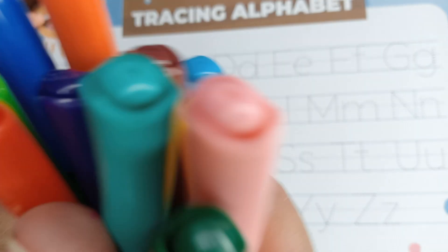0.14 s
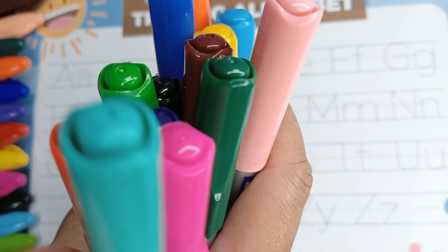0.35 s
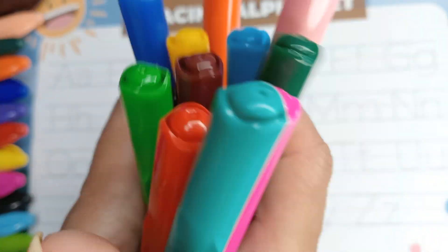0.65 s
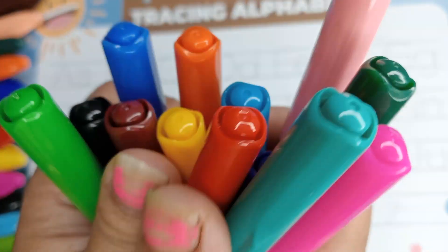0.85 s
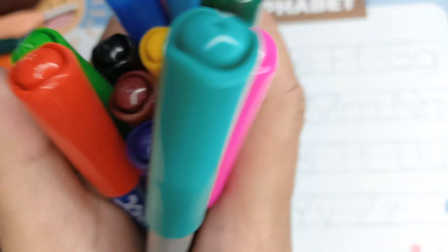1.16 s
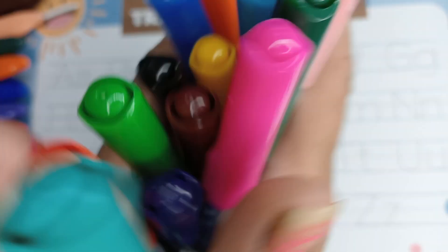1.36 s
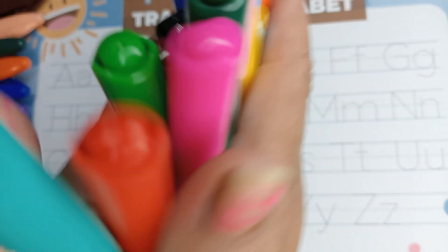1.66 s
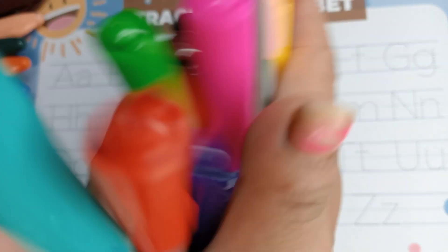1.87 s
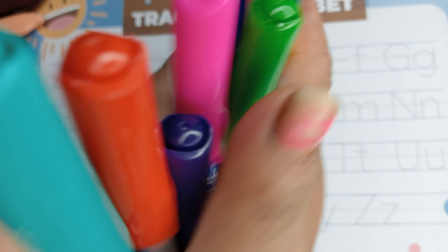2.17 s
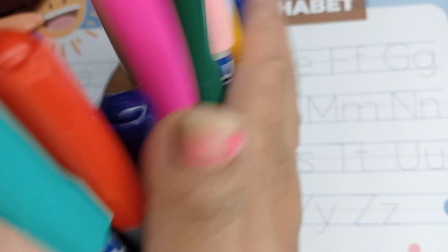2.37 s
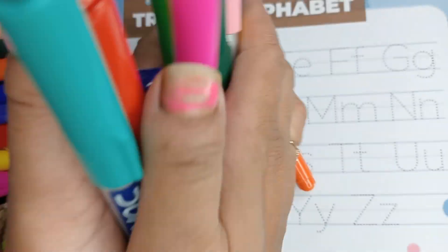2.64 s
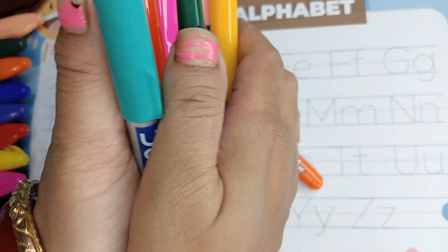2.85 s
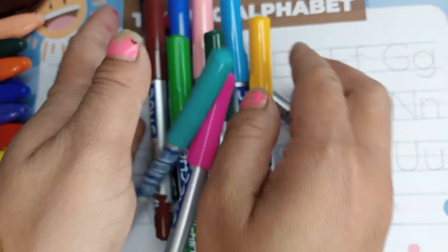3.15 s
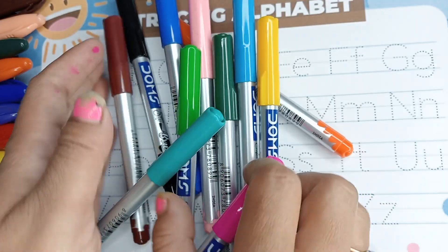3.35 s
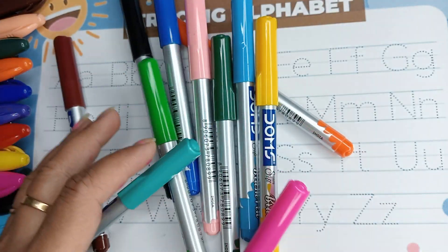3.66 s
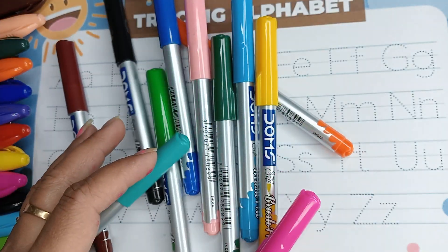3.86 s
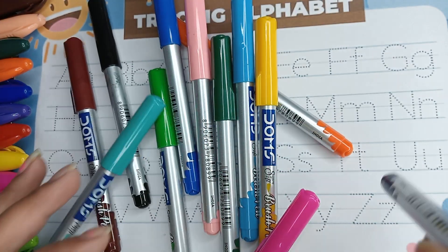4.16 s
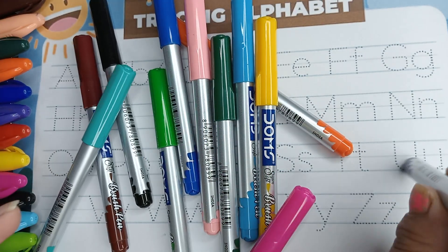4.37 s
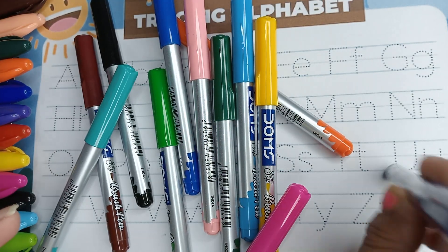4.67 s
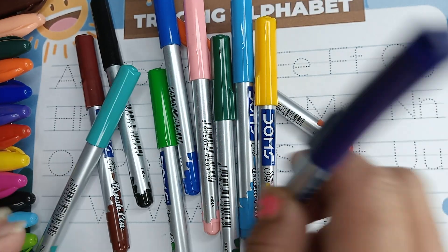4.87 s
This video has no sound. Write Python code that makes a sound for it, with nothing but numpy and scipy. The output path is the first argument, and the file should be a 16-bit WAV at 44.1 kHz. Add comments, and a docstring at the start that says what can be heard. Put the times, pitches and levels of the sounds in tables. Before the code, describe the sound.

A bundle of pens clicks in rubbing hands, spills onto paper with dull desk thuds, followed by three loud, sharp raps.

```python
"""A handful of plastic pens is rolled between two palms: skin rubs, barrels knock together in bursts.
From 2.2 s they drop on a paper pad and the desk under it thuds; the heap settles by 4.2 s.
From 4.4 s one pen is rapped down three times; the loudest raps overload the microphone.
A small furnished room answers throughout, over a faint room tone."""
import sys
import numpy as np
from scipy import signal
from scipy.fft import rfft, irfft, next_fast_len
from scipy.io import wavfile

SR = 44100
rng = np.random.default_rng(int(sys.argv[2]) if len(sys.argv) > 2 else 0)


def digitize_waveform(pressure):
    """Quantize a signal to 16-bit integers and store it at the path in sys.argv[1].

    Rows of a 2-D input are taken as channels; values are limited to [-1, 1].
    """
    field = np.atleast_2d(pressure).T
    bounded = np.clip(field, -1, 1)
    quanta = np.round(bounded * 32767).astype(np.int16)
    wavfile.write(sys.argv[1], SR, quanta)


N = 221330


def from_db(db):
    """Decibels to gain."""
    return 10 ** (np.asarray(db) / 20)


def unit_rms(x):
    """Scale to rms 1."""
    return x / np.sqrt(np.mean(x ** 2) + 1e-20)


def at_hz(points, hz):
    """Interpolate a table on a log-frequency axis."""
    points_hz, values = np.transpose(points)
    return np.interp(np.log(hz + 1), np.log(points_hz), values)


def butter(x, order, edge_hz, kind):
    """Butterworth filter."""
    return signal.sosfilt(signal.butter(order, edge_hz, kind, fs=SR, output="sos"), x)


def strike(times_s, peak_db, modes, contact_s, pitch_spread, spread_db, samples,
           phase_spread_cycles=0, pitch_scale=1, at_peak=True):
    """Each blow rings all modes, swelling during contact. Times mark peaks if at_peak, else onsets."""
    hz, mode_db, t60_s = np.transpose(modes)[:, None, :, None]
    jitter = rng.standard_normal((len(times_s), 3 * len(modes)))[:, :, None]
    t = np.arange(samples) / SR
    hz = hz * np.reshape(pitch_scale, (-1, 1, 1)) * np.exp(pitch_spread * jitter[:, 0::3])
    phase = 2 * np.pi * (hz * t + phase_spread_cycles * jitter[:, 2::3])
    rings = from_db(mode_db + spread_db * jitter[:, 1::3] - 60 * t / t60_s) * np.sin(phase)
    blows = rings.sum(axis=1) * (1 - np.exp(-(t / contact_s) ** 2))
    blows *= (from_db(peak_db) / np.abs(blows).max(axis=1))[:, None]
    start = (np.asarray(times_s) * SR).astype(int) - at_peak * np.abs(blows).argmax(axis=1)
    out = np.zeros(N + samples)
    np.add.at(out, np.maximum(start, 0)[:, None] + np.arange(samples), blows)
    return out[:N]


# room tone spectrum: (frequency [Hz], relative density [dB])
ROOM_TONE = [(18, -48), (30, -24), (59, -15.5), (199, -12), (336, -12.5), (384, -14), (584, -22.5),
             (2170, -26), (16000, -47.5)]


def room_tone(rms_db=-67.5):
    """Steady, faint, low noise."""
    shape = from_db(at_hz(ROOM_TONE, np.arange(N // 2 + 1) * SR / N))
    return from_db(rms_db) * unit_rms(irfft(rfft(rng.standard_normal(N)) * shape, N))


# echo decay: (frequency [Hz], t60 [s])
ROOM_DECAY = [(100, 0.41), (260, 0.47), (700, 0.3), (1840, 0.34), (4850, 0.28), (12800, 0.2)]
# echo colour: (frequency [Hz], gain [dB])
ROOM_COLOUR = [(100, -12), (400, -7), (1200, -17.5), (3000, -15.5), (6000, -14.5), (10000, -17),
               (15000, -14)]


def room(x, first_echo_s=0.00051):
    """Diffuse echoes: octave bands of noise, each dying at its own rate."""
    t = np.arange(SR // 2) / SR
    echoes = np.zeros(len(t))
    for low_hz in 60 * 2. ** np.arange(8):
        band = butter(rng.standard_normal(len(t)), 2, [low_hz, 2 * low_hz], "band")
        echoes += band * from_db(-60 * t / at_hz(ROOM_DECAY, low_hz * np.sqrt(2)))
    echoes *= np.clip(t / first_echo_s - 1, 0, 1) / np.sqrt(np.sum(echoes ** 2))
    size = next_fast_len(N + len(t))
    colour = from_db(at_hz(ROOM_COLOUR, np.arange(size // 2 + 1) * SR / size))
    return irfft(rfft(x, size) * rfft(echoes, size) * colour, size)[:N]


# thump modes: (multiple of thump pitch [1], level [dB], t60 [s])
THUMP_MODES = [(1, -4, 0.023), (1.4, -3, 0.0097), (2.401, -2, 0.015)]
# desk top modes: (frequency [Hz], level [dB], t60 [s])
DESK_MODES = [(111, -1.5, 0.073), (152.9, 2, 0.23), (263, -2.5, 0.13), (384.8, -2.5, 0.15)]
# blows reaching the desk: (time [s], thump peak [dB], thump pitch [Hz], ring re thump [dB])
THUDS = [(2.232, -25, 124, -10.5), (2.325, -46, 144, -18), (2.448, -32, 156, -6), (2.498, -28, 108, -12),
         (2.561, -54, 137, 7), (2.701, -35.5, 162, -12), (2.721, -31, 83.4, -9), (2.811, -25.5, 130, -15),
         (2.898, -35, 150.6, -4), (3.131, -24, 146, -18), (3.154, -16, 210, -5.5), (3.2, -22, 246, -7),
         (3.243, -21, 131, -5.5), (3.288, -20, 150, -10), (3.376, -21.5, 148, -6), (3.437, -40.5, 137, 5),
         (3.484, -22.5, 258, -8.5), (3.53, -23.5, 398, -8.5), (3.547, -23.5, 158, -18),
         (3.726, -12, 169, -11.5), (3.869, -50, 114, 9), (3.955, -35, 148, 5), (4.069, -44.5, 156.6, -22),
         (4.17, -53, 163, -1), (4.425, -22, 255, -11), (4.602, -20, 414, -9.5), (4.793, -23.5, 427, -2.5)]


def desk_thuds():
    """A dull thump under each blow, then the desk top rings on."""
    times_s, peak_db, pitch_hz, ring_db = np.transpose(THUDS)
    thump = strike(times_s, peak_db, THUMP_MODES, contact_s=0.002,
                   pitch_spread=0.01, spread_db=3, samples=3000, pitch_scale=pitch_hz)
    ring = strike(times_s, peak_db + ring_db, DESK_MODES, contact_s=0.0042,
                  pitch_spread=0.016, spread_db=2.5, samples=9000, at_peak=False)
    return -(thump + ring)


# palm strokes and heap slides: (start [s], end [s], rattle [dB], pad re barrel [dB], skin rub [dB])
STROKES = [(0.0, 0.024, -37.5, -13.5, -55), (0.105, 0.188, -30.5, -14.5, -45.5),
           (0.258, 0.336, -44.5, -15, -62), (0.336, 0.362, -30, -13, -47.5), (0.39, 0.428, -25.5, -13, -46),
           (0.496, 0.511, -37, -15, -51), (0.522, 0.58, -30.5, -9.5, -47.5),
           (0.695, 0.745, -28.5, -12, -47), (0.838, 0.856, -38.5, -11.5, -55),
           (0.875, 0.909, -27, -13, -46.5), (1.007, 1.133, -39, -12.5, -54), (1.208, 1.271, -40, -7, -51.5),
           (1.339, 1.401, -29.5, -13, -47), (1.484, 1.54, -29, -14, -43), (1.622, 1.692, -28.5, -14.5, -46),
           (1.749, 1.762, -45, -13, -50.5), (1.775, 1.833, -27, -8.5, -45),
           (1.908, 1.974, -24.5, -13, -42.5), (2.034, 2.098, -25, -8.5, -45.5),
           (2.157, 2.178, -36, -11.5, -58), (2.188, 2.246, -21.5, -12, -40),
           (2.285, 2.361, -27.5, -8, -42.5), (2.43, 2.425, -26, -10.5, -56), (2.458, 2.504, -30, -8.5, -53),
           (2.569, 2.608, -31, -5, -46.5), (2.76, 2.83, -40, 6, -51), (2.887, 2.909, -34, -2.5, -48),
           (3.048, 3.108, -40.5, -9.5, -62), (3.141, 3.303, -34.5, 6.5, -44.5),
           (3.341, 3.437, -47.5, 12.5, -70), (3.46, 3.56, -46.5, 0.5, -70), (3.735, 3.82, -51, 6.5, -77),
           (3.858, 3.913, -65, 5, -72)]


def palm_rub():
    """Dull noise of rubbing skin, following the strokes."""
    rub = unit_rms(butter(rng.standard_normal(N), 2, [130, 800], "band"))
    t = np.arange(0, N / SR, 0.002)
    rub_db = np.transpose(STROKES)[4]
    level_db = stroke_db(t, rub_db, swell_db=5, rise_db_per_s=501.5, fall_db_per_s=502.5).max(axis=0)
    return from_db(np.interp(np.arange(N) / SR, t, level_db)) * rub


def stroke_db(t, end_db, swell_db, rise_db_per_s, fall_db_per_s):
    """Level at times t, one row per stroke: sets in, swells to end_db, dies."""
    start_s, end_s = np.transpose(STROKES)[:2, :, None]
    ramp_db = swell_db * np.clip((t - end_s) / (end_s - start_s), -1, 0)
    onset_db = rise_db_per_s * np.maximum(start_s - t, 0)
    release_db = fall_db_per_s * np.maximum(t - end_s, 0)
    return end_db[:, None] + ramp_db - onset_db - release_db


def pen_rattle(touches=2400, spill_s=0.02):
    """Light touches at random moments in and just around the strokes, following their level."""
    start_s, end_s, rattle_db, pad_db, _ = np.transpose(STROKES)
    spans_s = end_s - start_s + 2 * spill_s
    edges_s = np.cumsum(spans_s)   # strokes laid end to end
    place_s = rng.uniform(0, spans_s.sum(), touches)
    stroke = np.searchsorted(edges_s, place_s)
    times_s = np.maximum(end_s[stroke] + spill_s - (edges_s[stroke] - place_s), 0)
    levels_db = stroke_db(times_s, rattle_db, swell_db=2.5, rise_db_per_s=604.5, fall_db_per_s=412)
    # duller as the pad takes more of the blow
    cap_db = -10 - 0.45 * (pad_db[stroke] - pad_db.mean()) + 7 * rng.standard_normal(touches)
    force_db = 6.25 * np.minimum(rng.exponential(1, touches), 2.4) - 7.5
    barrel_db = levels_db[stroke, np.arange(touches)] + force_db
    return knock(times_s, barrel_db, pad_db[stroke], cap_db)


def contact_tick(times_s, level_db, t60_s=0.0022, samples=120):
    """The contact itself: a very short puff of bright noise."""
    offsets = np.arange(samples)
    envelopes = from_db(level_db[:, None] - 60 * offsets / SR / t60_s)
    puffs = rng.standard_normal(envelopes.shape) * envelopes
    out = np.zeros(N + samples)
    np.add.at(out, (times_s * SR).astype(int)[:, None] + offsets, puffs)
    return butter(out[:N], 2, 4500, "high")


# modes of barrel, paper pad and cap: (frequency [Hz], level [dB], t60 [s])
BARREL_MODES = [(1989, -0.5, .009), (2282, -1, .007), (2624, -4, 0.012), (3080, 3, .007),
                (3611, -1, 0.0087), (4272, -3.5, 0.0068), (4650, -3, .005)]
PAD_MODES = [(485, -16, .006), (800, -16, 0.005), (1042.7, -1, .009), (1230, 2, 0.01), (1452.6, -1, .009),
             (1662, -9, 0.008)]
CAP_MODES = [(5366, 7, 0.0025), (6352, -1, 0.0042), (7170, -14, 0.0069), (7910, -3.5, 0.0029),
             (8265, 3, 0.0022), (9254, -5.5, 0.0066), (10330, 0.5, 0.0032), (11300, -13, .002),
             (11310, -9, 0.0031), (13520, -8.5, 0.0014), (14700, -6.5, 0.0021), (13730, -11.5, 0.0024)]


def knock(times_s, barrel_db, pad_db, cap_db):
    """A knock rings the barrel, the pad below and the stiff cap; pad_db and cap_db are re barrel."""
    spread = dict(pitch_spread=0.045, spread_db=3.2)   # pens differ in pitch, contacts in what they excite
    barrel = strike(times_s, barrel_db, BARREL_MODES, contact_s=0.0011,
                    samples=380, phase_spread_cycles=1, **spread)
    pad = strike(times_s, barrel_db + pad_db, PAD_MODES, contact_s=0.0008,
                 samples=380, phase_spread_cycles=0.96, **spread)
    cap = strike(times_s, barrel_db + cap_db, CAP_MODES, contact_s=0.0012,
                 samples=220, phase_spread_cycles=1, **spread)
    tick = contact_tick(times_s, barrel_db + cap_db - 1.5)
    return butter(barrel + pad + cap + tick, 2, 430, "high")   # thin pens radiate little bass


# pen on pen or pad: (time [s], barrel level [dB], pad re barrel [dB], cap re barrel [dB])
KNOCKS = [(0.0217, -21, -21, -14), (0.075, -34, -17, 2), (0.089, -28, -12, -16), (0.0966, -19, -18, -11),
          (0.1268, -15, -19, -10), (0.1339, -8, -17, -11), (0.1498, -11, -17, -10), (0.1756, -11, -12, -5),
          (0.1866, -6, -23, -13), (0.212, -20, -14, -15), (0.2861, -25, -9, -5), (0.3036, -22, -19, -16),
          (0.3434, -17, -18, -7), (0.3473, -18, -18, -13), (0.3554, -11, -18, -16), (0.3871, -14, -17, -4),
          (0.3964, -19, -11, -5), (0.4095, -12, -10, -6), (0.4311, -17, -3, 0), (0.5213, -23, -11, 0),
          (0.5256, -11, -15, -8), (0.5324, -18, -16, -16), (0.5446, -21, -5, 3), (0.6114, -14, -13, -2),
          (0.6666, -29, -4, -4), (0.6963, -23, -9, 7), (0.7072, -22, -2, -2), (0.7295, -24, -16, -2),
          (0.7449, -22, -5, -12), (0.7611, -25, -1, 4), (0.8387, -30, -8, -6), (0.8451, -25, -11, -5),
          (0.8803, -15, -8, -8), (0.8889, -24, -12, 0), (0.8928, -27, 0, 12), (0.8994, -17, -14, -5),
          (1.0126, -34, -11, 8), (1.0305, -22, -12, -8), (1.055, -23, -14, -9), (1.0918, -25, -12, -9),
          (1.1089, -27, -15, -5), (1.1868, -38, 0, -6), (1.2078, -34, -4, -2), (1.2921, -32, -5, -7),
          (1.3273, -31, -9, -6), (1.3325, -23, -7, 1), (1.3697, -17, -13, -6), (1.4235, -22, -9, -16),
          (1.4773, -18, -17, -10), (1.4828, -23, -14, -6), (1.487, -23, -11, -11), (1.521, -21, -4, -10),
          (1.5289, -13, -14, -3), (1.5507, -19, -8, -15), (1.6251, -24, -16, -4), (1.63, -18, -11, -9),
          (1.6385, -23, -5, -4), (1.6511, -23, -5, -2), (1.6759, -15, -8, -12), (1.6881, -22, -13, -1),
          (1.6964, -15, -11, -11), (1.752, -27, -10, -1), (1.7595, -20, -9, -11), (1.7802, -22, -8, -8),
          (1.8241, -16, -13, -11), (1.8867, -27, -9, 1), (1.8946, -28, -8, 0), (1.9089, -20, -5, -6),
          (1.9158, -17, -7, -7), (1.9489, -15, -7, -7), (1.9746, -13, -16, -15), (1.9841, -13, -9, -5),
          (2.0341, -20, -10, -6), (2.0394, -19, -15, -8), (2.0582, -18, -9, -1), (2.083, -14, -12, -11),
          (2.0961, -19, -8, 1), (2.1022, -15, -14, -7), (2.1606, -23, -22, -10), (2.1922, -13, -5, -4),
          (2.1969, -16, -9, -6), (2.2052, -14, -13, -6), (2.2267, -12, 8, -19), (2.233, -12, 1, -8),
          (2.237, -17, 8, -3), (2.3257, -22, 6, -13), (2.3424, -9, -14, -15), (2.3719, -21, -8, 0),
          (2.3766, -17, -17, -5), (2.4161, -22, -12, -8), (2.4212, -15, -11, -5), (2.449, -30, 11, -13),
          (2.4603, -19, -5, -4), (2.4649, -14, -13, -10), (2.495, -14, 8, -14), (2.5073, -22, 4, -7),
          (2.5783, -22, -13, -15), (2.6, -28, 4, 0), (2.6266, -29, 6, -12), (2.6958, -21, 12, -30),
          (2.6998, -21, -10, -14), (2.7576, -38, 17, -17), (2.7911, -33, 17, -10), (2.8099, -29, 11, -26),
          (2.8192, -20, 2, -29), (2.8874, -28, -3, -11), (2.9034, -22, -1, -6), (2.9179, -23, -5, -9),
          (2.9839, -28, -6, -20), (3.0462, -28, -8, -9), (3.1309, -12, 9, -17), (3.1452, -20, 6, -21),
          (3.1546, -9, 4, -17), (3.1605, -16, 6, -17), (3.1646, -7, 3, -19), (3.1684, -11, 1, -19),
          (3.1772, -13, 1, -20), (3.2003, -17, 2, -20), (3.2202, -17, -3, -19), (3.2332, -34, 18, -11),
          (3.2421, -16, 7, -9), (3.2593, -8, -1, -22), (3.2723, -21, 8, -20), (3.2888, -23, 10, -22),
          (3.2988, -14, -3, -20), (3.3609, -23, -1, -28), (3.3734, -14, -3, -16), (3.4832, -15, 6, -29),
          (3.5249, -7, -5, -19), (3.7612, -24, -15, -5), (3.7985, -26, 0, -20), (3.8739, -35, 3, -29),
          (3.8807, -51, 23, -14), (3.9049, -34, -7, -18), (3.9589, -19, 10, -20), (3.9801, -37, 15, -26),
          (4.0681, -36, 8, -16), (4.1814, -49, 13, -29)]


def pen_knocks(gain_db=1):
    """Distinct knocks as the pens roll, fall and settle."""
    return from_db(gain_db) * knock(*np.transpose(KNOCKS))


# crack of the rapped tip: (frequency [Hz], gain [dB])
CRACK_COLOUR = [(1500, -18), (3800, -29), (4800, -16.5), (6300, -10.5), (9000, -15.5), (12000, -25),
                (15500, -34)]


def tip_crack(times_s, level_db):
    """A bare click at each rap, coloured as it leaves for the walls."""
    clicks = np.zeros(N)
    clicks[(times_s * SR).astype(int)] = from_db(level_db)
    colour = from_db(at_hz(CRACK_COLOUR, np.arange(N // 2 + 1) * SR / N))
    return irfft(rfft(clicks) * colour, N)


# modes of rapped pen and pad: (frequency [Hz], level [dB], t60 [s])
RAP_MODES = [(358, -3.5, 0.009), (1116, -0.5, 0.022), (1265, 4.5, 0.011), (1560, 12.5, 0.0061),
             (1820, 5, 0.0067), (2343, 0.5, 0.012), (2997, 5.5, 0.0073), (3510, -11.5, 0.013),
             (6060, -1.5, 0.0042), (6950, -44, .003), (10130, -25, 0.011), (11470, -39, 0.0018),
             (14500, -33, .003)]
# one faint touch, three raps: (time [s], peak [dB])
RAPS = [(4.396, -28), (4.4257, 5), (4.6036, 1.5), (4.7925, 5.5)]


def pen_raps():
    """One pen hits the pad hard; returns the ring of both and the crack of the tip."""
    times_s, peak_db = np.transpose(RAPS)
    ring = -strike(times_s, peak_db, RAP_MODES, contact_s=0.000236,
                   pitch_spread=0.015, spread_db=1, samples=1500)
    return ring, tip_crack(times_s, peak_db)


def scene():
    """Pens, desk and hands in the room."""
    raps, crack = pen_raps()
    pens = pen_knocks() + pen_rattle()
    desk_and_palms = desk_thuds() + palm_rub()
    rap_body = butter(raps, 4, 4470, "low")   # higher up, the walls get the crack rather than the ring
    echoes = room(from_db(4) * pens + from_db(-3.5) * desk_and_palms
                  + from_db(5.5) * rap_body + from_db(16.5) * crack)
    return (pens + raps + desk_and_palms + echoes + room_tone())[None]


def record(dry, low_hz=68, cutoff_hz=15550):
    """The microphone drops the deep bass, the loudest peaks are rounded off, the top is cut."""
    sound = butter(dry, 4, low_hz, "high")
    rounded = sound / (1 + sound ** 4) ** (1 / 4)
    top_cut = signal.ellip(10, 0.5, 80, cutoff_hz, fs=SR, output="sos")
    return 1.05 * signal.sosfilt(top_cut, rounded)


dry = scene()
out = record(dry)
digitize_waveform(out)
```